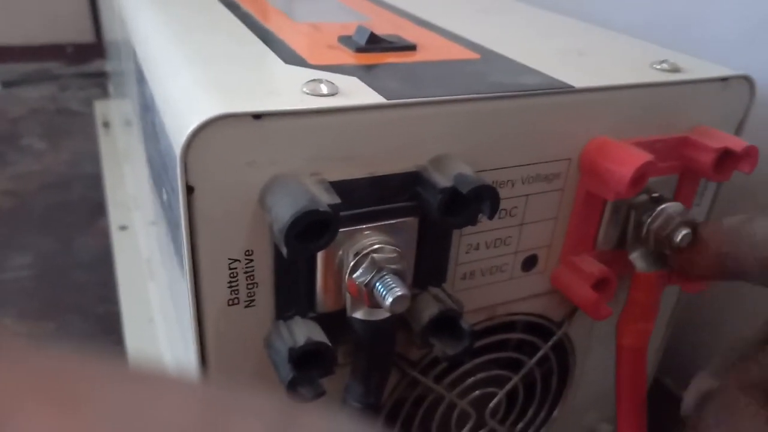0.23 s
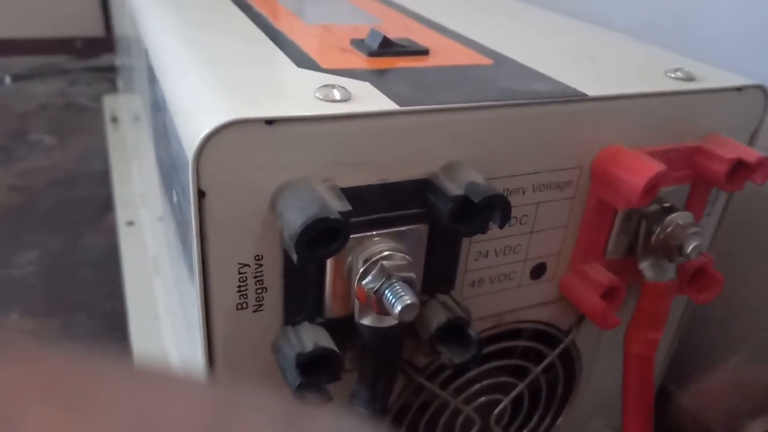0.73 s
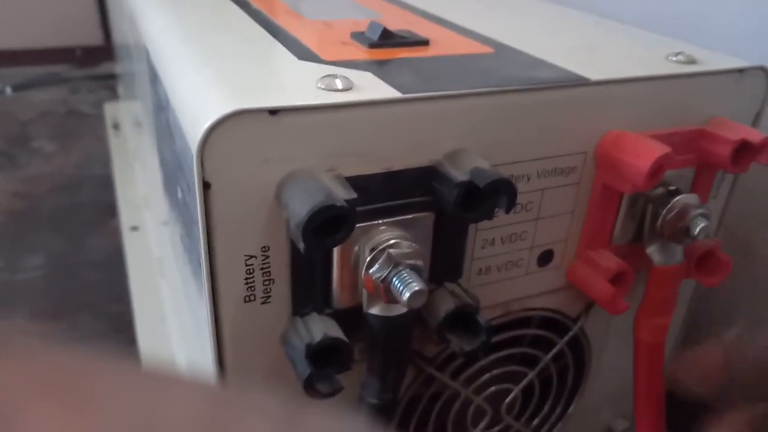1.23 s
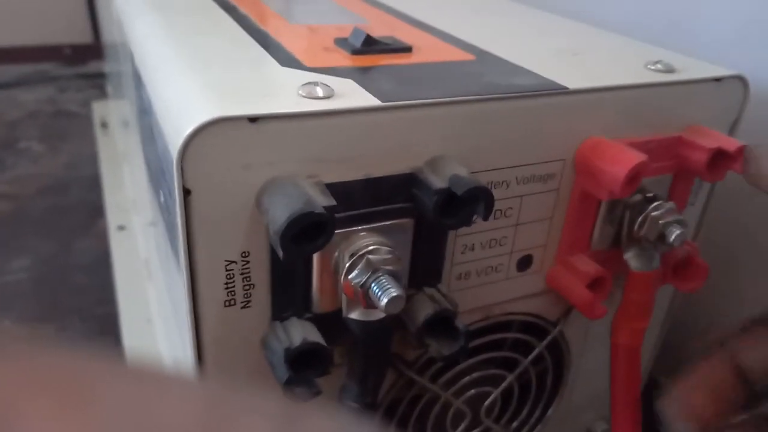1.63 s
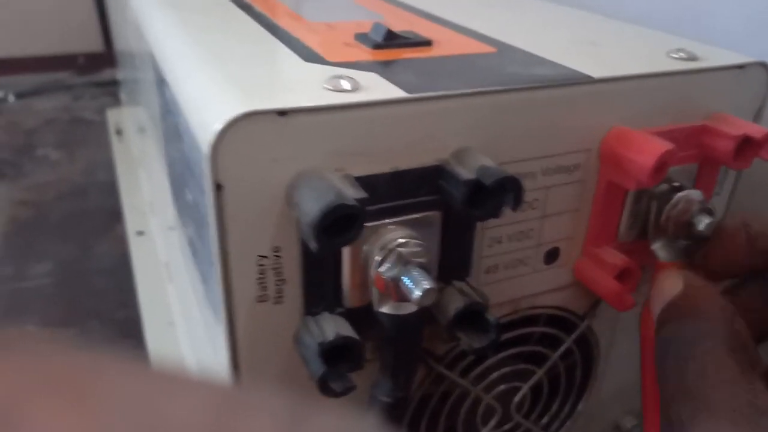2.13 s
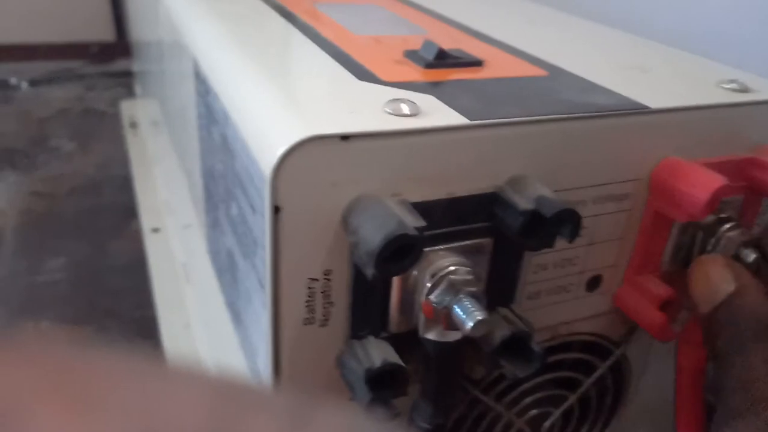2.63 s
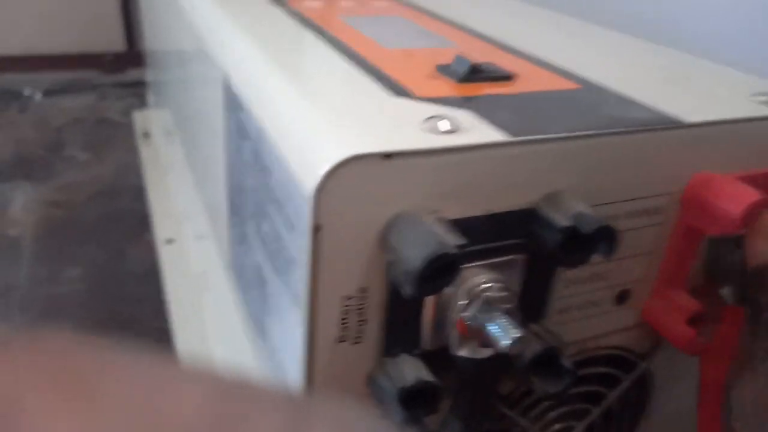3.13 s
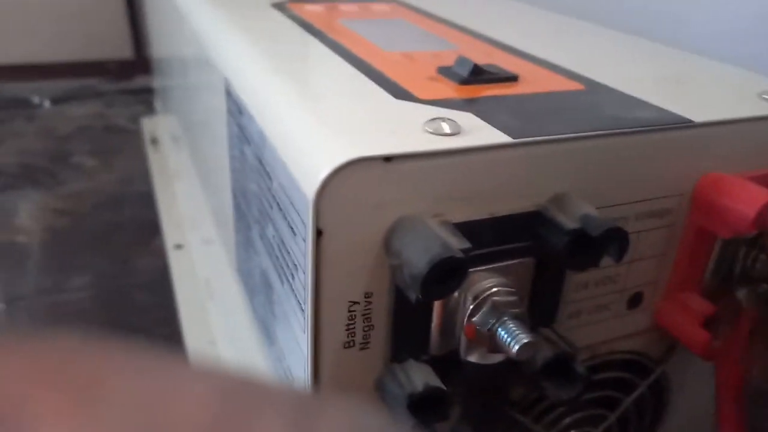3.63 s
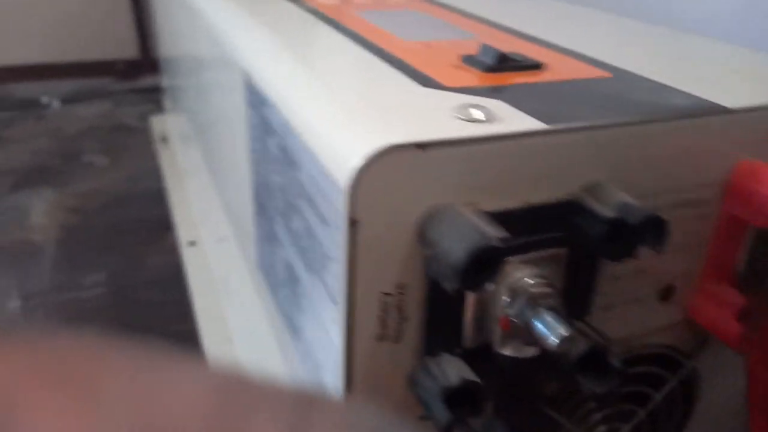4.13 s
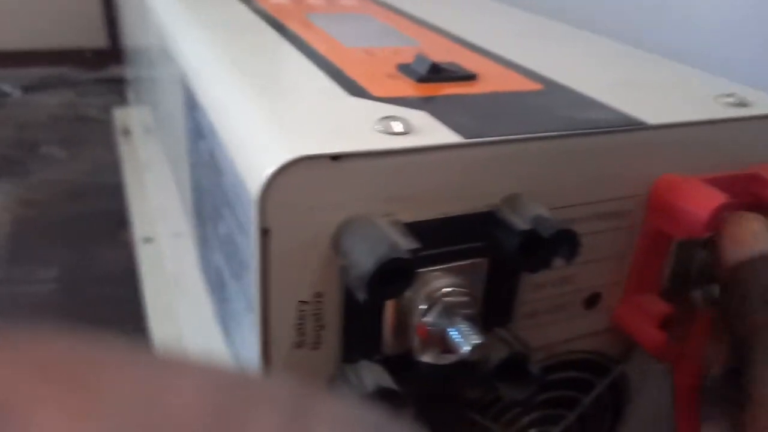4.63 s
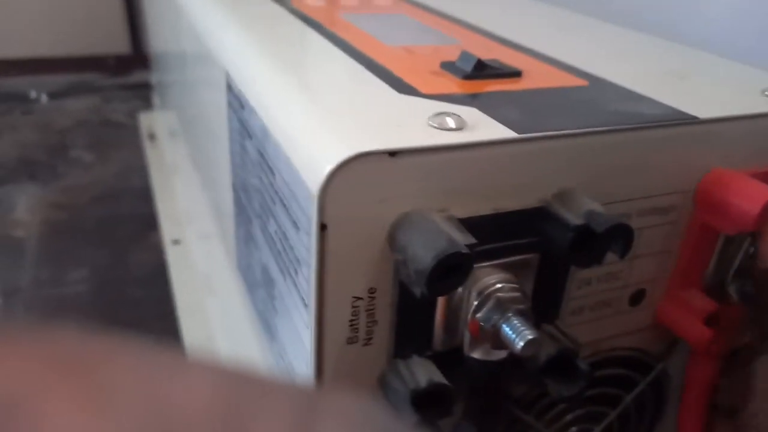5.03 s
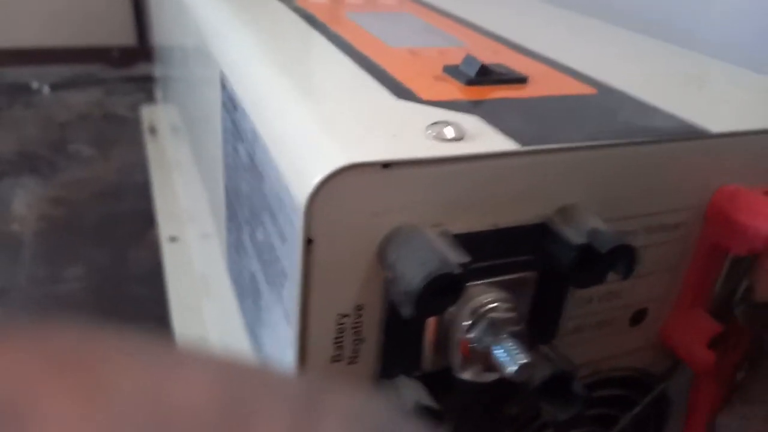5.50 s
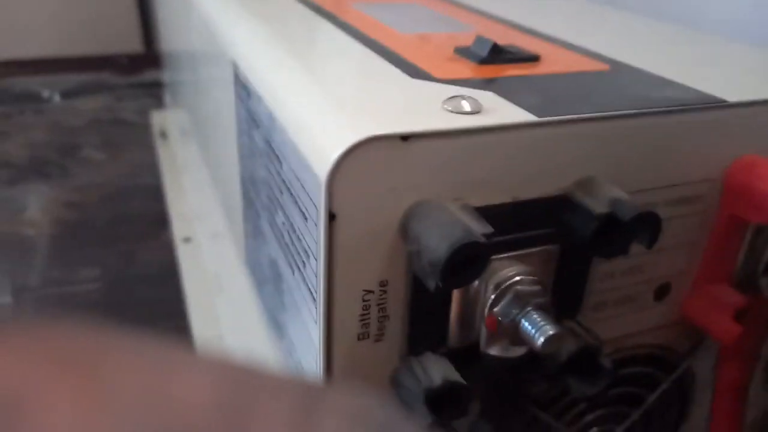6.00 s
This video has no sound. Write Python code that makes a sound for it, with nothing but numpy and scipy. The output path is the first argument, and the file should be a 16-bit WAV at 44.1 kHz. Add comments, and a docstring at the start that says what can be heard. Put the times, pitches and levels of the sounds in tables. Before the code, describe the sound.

A nut is turned by hand on a threaded metal stud fixed to a sheet-steel cabinet, heard very close in a small quiet room. From 0 to 0.65 s come hard, bright clacks with gritty thread scraping and low hollow booms from the case, strongest around 0.2, 0.4 and 0.6. After a short gap, clacks at 0.85 and 1.14 lead to a tight loud burst at 1.35 to 1.4, then more at 1.6 and 1.85. A slightly softer rattle follows near 2.3, faint touches near 2.7, and a clicking cluster at 3.05 to 3.2. From 3.3 on, ticks grow weak, duller and small, with gentle case knocks near 4.1, 5.15 and 5.9. Faint fingertip rustle, a barely audible steady high whine and quiet low-weighted hiss lie underneath to about 6.3 s. Rings are short and dry.

```python
"""Hard clacks of a loose nut on the thread of a terminal stud come first, as fingers spin it down.
The stud stands on a sheet-steel cabinet in a small room: each contact excites many short steel modes,
and tiny slips of the thread grind through the same modes. Hand pressure drives low cabinet resonances
with noise, and fingertips rustle as flickering bands of noise. A thin steady-pitched high tone is a sine
under a level curve; a quiet hiss is noise in narrow bands, with a level curve for those above 1 kHz."""
import sys
import numpy as np
from scipy import signal
from scipy.fft import rfft, irfft, next_fast_len
from scipy.io import wavfile
from scipy.ndimage import uniform_filter1d

SR = 44100
rng = np.random.default_rng(int(sys.argv[2]) if len(sys.argv) > 2 else 0)


def write(x):
    x = np.atleast_2d(x).T
    wavfile.write(sys.argv[1], SR, np.round(np.clip(x, -1, 1) * 32767).astype(np.int16))


N = 276066

# correlation of the two microphone ports: (frequency [Hz], left-right likeness [0 to 1])
LIKENESS = [(40, 0.74), (140, 0.96), (300, 0.89), (650, .65), (1200, 0.14), (15000, 0.012)]


def amp(db):
    """Amplitude ratio from its logarithm, the decibel."""
    return 10 ** (np.asarray(db) / 20)


def rms_one(x):
    """Normalisation of mean power: scale to unit rms."""
    return x / np.sqrt(np.mean(x ** 2) + 1e-20)


def in_time(rows):
    """Linear interpolation in time: each column of a curve table, one value a sample."""
    s, *columns = np.transpose(rows)
    return [np.interp(np.arange(N) / SR, s, column) for column in columns]


def at_hz(points, hz):
    """Interpolation over log frequency, the scale of pitch."""
    table_hz, values = np.array(points).T
    return np.interp(np.log(hz), np.log(table_hz), values)


def noise_pair(hz):
    """Partial coherence: mid and side noise mixed to the port correlation at this frequency."""
    mid, side = rng.uniform(-1, 1, (2, N))
    alike = np.clip(at_hz(LIKENESS, hz), 0, 1)
    return np.sqrt(1 + alike) * mid + np.sqrt(1 - alike) * side * [[1], [-1]]


def steel_modes(count):
    """Modal superposition: dense sheet modes and clear stud modes as decaying sines, one per channel."""
    # clearest modes of stud and bus bar: (frequency [Hz], relative level [dB], t60 [s])
    stud = [(803.4, 9.5, 0.057), (960, -6, 0.2), (1061, -9, 1), (1254, -3.5, 0.71), (2040, -3, .24),
            (2245, -3, .14), (2370, -3, .14), (2495, -2, .14), (2640, -2, .14), (2860, -1, .16),
            (3140, -2, .1), (5200, -4, .1), (5800, 0, .08), (6160, -4, .08), (11400, 0.5, .04),
            (12050, 7, 0.05), (15330, -16.5, .04)]
    # spectrum of the dense sheet modes: (frequency [Hz], relative level per Hz [dB])
    sheet = [(180, -34), (300, -10.5), (488, -8), (694, -12), (1290, -6), (1660, -13.5), (2000, -4.5),
             (3140, -7), (5460, -11.5), (5930, -4), (7630, -23), (9490, -17), (14200, -22), (15700, -41),
             (16500, -48)]
    # sheet decay ahead of the scatter below: (frequency [Hz], t60 [s])
    sheet_t60 = [(300, 0.9), (1500, 0.37), (5000, 0.18), (14000, 0.092)]
    sheet_hz = np.sort(rng.uniform(np.sqrt(300), np.sqrt(16500), count) ** 2)
    stud_hz, stud_db, stud_t60 = np.transpose(stud)
    hz = np.r_[sheet_hz, stud_hz]
    scattered_t60 = at_hz(sheet_t60, sheet_hz) * amp(rng.normal(-4.0, 3.0, count))
    t60 = np.r_[scattered_t60, stud_t60]

    # sparser, shorter modes carry more each
    width_db = 5 * np.log10(sheet_hz / 3000) - 10 * np.log10(scattered_t60)
    level_db = np.r_[at_hz(sheet, sheet_hz) + width_db, stud_db + 4.0]

    # the ports hear each mode at another phase, further apart where they are less alike
    t = np.arange(int(0.26 * SR), dtype=np.float32) / SR
    left = rng.uniform(0, 2 * np.pi, len(hz))
    spread = np.sqrt(-2 * np.log(np.clip(at_hz(LIKENESS, hz), 0.01, 1)))
    right = left + spread * rng.standard_normal(len(hz))
    settings = np.float32([2 * np.pi * hz, np.log(1000) / t60, left, right])
    turn, loss, left, right = settings[:, :, None]
    fade = np.exp(-loss * t)
    rings = np.array([fade * np.sin(turn * t + phase) for phase in (left, right)])
    return hz, level_db, rings, t


def clacks(hz, level_db, rings, t):
    """Impact excitation: a first blow and a swelling, dying chatter convolved with the steel's response."""
    # nut against thread: (time [s], nominal peak level [dB], 300-1500 Hz level [dB],
    # 4.5-7 kHz level [dB], 8-15 kHz level [dB], chatter time constant [ms])
    contacts = np.array([(0.0024, -24, -40, -13, -22, 1.4), (0.023, -28, -22, -2, -5, 1.6),
                         (0.155, -27.5, -14, 7, 2.5, 1.8), (0.1715, -23.5, -44, -22, -43, 1.6),
                         (0.1847, -14.5, -28, -13, -19.5, 1.5), (0.2533, -24, -9, -10.5, -13, 0.62),
                         (0.3733, -26, -33, -12, -18, 2.7), (0.3948, -26, -17, -13, -19, 4.2),
                         (0.4073, -12.5, -25.5, -15, -19, 1.5), (0.4636, -25, -5, -9, -9, 1.6),
                         (0.591, -27.5, -18, 0, -1, 2), (0.617, -9, -20, -13.5, -24, 3),
                         (0.8543, -22, -18, 1, -5.5, 3.3), (1.0718, -25.5, -34, -9, -7.5, 2.3),
                         (1.1365, -27.5, -32, -18, -20.5, 7), (1.1444, -14.5, -24, -9, -14.5, 1.67),
                         (1.228, -32.5, -8.5, 2, -0.5, 4.4), (1.3431, -27, -42, -14, -22, 1.6),
                         (1.3587, -13, -38, -10.5, -11, 1.1), (1.3711, -11.5, -16.5, -14, -19.5, 4.1),
                         (1.412, -22.5, -7, -5, -4.5, 0.82), (1.594, -20.5, -13, 5.5, 5, 2.2),
                         (1.6191, -11.5, -27, -2, -3, 1.2), (1.7603, -26, -47, -13, -20.5, 1.55),
                         (1.809, -33, -33, -21, -37, 1.8), (1.8403, -18, -33, -15.5, -18, 4.1),
                         (1.8486, -17, -22.5, -10.5, -17, 2.4), (2.2347, -31.5, -16.5, -3, -13.5, 0.86),
                         (2.271, -28, -24, -20, -25, 2.7), (2.2865, -21, -34, -14.5, -19, 7.5),
                         (2.3062, -18, -23, -13, -18.5, 9.7), (2.372, -30.5, -30, -15, -24, 1.9),
                         (2.3882, -21, -25.5, -18, -21, 1.4), (2.645, -46, -33, -10, -21, 3),
                         (2.663, -39.5, -22, -15, -26, 2.4), (2.6776, -31, -35, -15, -18, 1.4),
                         (2.6891, -29.5, -23, -14.5, -17.5, 8.9), (2.7228, -23, -22, -13, -15, 1.7),
                         (2.83, -42.5, -20, -20, -23, 2.6), (3.053, -21, -37, -5, -14.5, 7.4),
                         (3.0661, -23, -23.5, -13, -18.5, 9.9), (3.1216, -25, -16, -13, -18.5, 10.3),
                         (3.1447, -24.5, -26, -9, -20, 1.9), (3.1634, -17.5, -19, -12, -23.5, 0.88),
                         (3.2386, -45.5, -25, -3, -18, 6.4), (3.3245, -41, -18, -20, -35, 1.8),
                         (3.3407, -41, -14, -16, -38, 9.3), (3.3862, -37, -16, -20, -21, 2),
                         (3.4068, -29.5, -22, -11, -8.5, 8.6), (3.427, -21.5, -19.5, -13.5, -20, 5.5),
                         (3.5926, -51.5, -22.5, -1, -23, 13), (3.723, -45.5, -38, -17, -33, 2.8),
                         (3.7415, -31.5, -28, -13.5, -28, 11.6), (3.8077, -40, -5, -30, -16, 2.7),
                         (3.928, -55.5, -14, -30, -32, 12), (3.9638, -46.5, -15.5, 0, -10, 5.5),
                         (4.053, -42, -19, -10, -23, 1.5), (4.077, -43, -17, -19, -26, 3.9),
                         (4.091, -34, -24, -24, -21, 3.8), (4.1119, -27.5, -23, -20, -30, 2.6),
                         (4.2688, -45, -17, -4, -5, 4.4), (4.382, -55.5, -8, -11.5, -18, 3.4),
                         (4.396, -48.5, -12, -27, -18, 2.2), (4.4103, -36.5, -16.5, -18.5, -21.5, 8.2),
                         (4.4573, -41.5, -15, -25, -22.5, 2.2), (4.6305, -40.5, -7, -16.5, -21, 2.8),
                         (4.6565, -41.5, -6, -28, -25, 2.8), (4.7537, -57, -13, -6, -11, 7.2),
                         (4.8043, -42, -13, -21, -18, 2.4), (5.1327, -55, -11, -8, -17, 3),
                         (5.1466, -38.5, -19, -11, -20, 1.3), (5.157, -32.5, -26, -25, -20.5, 3.7),
                         (5.208, -40, 1, -11, -11, 6.1), (5.308, -50.5, -7, 13, -9, 12),
                         (5.3435, -35, -47, -9, -13, 0.73), (5.473, -48, -4, -9, -13, 3),
                         (5.4966, -43.5, -17, -31, -28, 2.9), (5.5198, -47, -10, -29, -35, 2.5),
                         (5.5825, -50, -25, -20, -23.5, 7.5), (5.7104, -40.5, -17, -7, -13, 1.15),
                         (5.861, -47, -7, -17, -26, 3.8), (5.874, -38.5, -7.5, -19.5, -24.5, 6.1),
                         (5.893, -48, -19.5, -20.5, -22, 1.7), (5.9594, -46, -10, -7, -14, 6.3),
                         (6.049, -53, -18.5, -7, -9, 15)])
    usual_db = (-17, -13, -17.5)    # what those three bands hold when the steel is struck evenly
    crest_db = 8.5                  # peak of a contact over its loudest rms
    first_blow_db, softer_db_per_ms = -2.5, 0.2     # blow against chatter; softer with a long chatter
    grip_t60_s, freer_s_per_ms = 1, 0.03    # damping by the fingers; freer with a long chatter

    # colour of each contact, and another spot that pushes or pulls each mode
    tilt_hz = (900, 1900, 3600, 5200, 7000, 9000)
    tilts = []
    for low, treble, top in contacts[:, 2:5] - usual_db:
        tilt_db = (low, 0, 0, treble, treble, top)
        tilts.append(at_hz(list(zip(tilt_hz, tilt_db)), hz))
    spot = rng.choice([-1, 1], (len(contacts), len(hz)))
    shared_db = rng.normal(0, 1.2, spot.shape)
    own_db = rng.normal(0, 4.1, (2, *spot.shape))   # for each channel
    struck = np.float32(spot * amp(level_db + tilts + shared_db + own_db)) @ rings
    struck *= 1 - np.exp(-t / 0.00029)      # the blow takes a moment to spread through the steel
    struck *= 1 + amp(5.5) * amp(-60 * t / 0.012)   # small parts crack and go quiet before the sheet

    span = np.arange(2600) / SR
    shape = (len(contacts), len(span))
    jolts = rng.laplace(size=shape) * (rng.random(shape) < 0.1)
    out = np.zeros((2, N + 2 * len(t)))
    for row, ring, jolt in zip(contacts, struck.swapaxes(0, 1), jolts):
        s, peak_db, *_, chatter_ms = row
        age = span / (max(chatter_ms, 0.2) / 1000)
        chatter = jolt * age * np.exp(-age)
        chatter = chatter / np.sqrt(np.sum(chatter ** 2) + 1e-9)
        chatter[0] = amp(first_blow_db - softer_db_per_ms * chatter_ms)
        damped = ring * amp(-60 * t / (grip_t60_s + freer_s_per_ms * chatter_ms))
        sound = signal.fftconvolve(damped, chatter[None], axes=1)
        loudest = np.max(uniform_filter1d(np.mean(sound ** 2, axis=0), size=300))
        at = round(s * SR)
        out[:, at:at + sound.shape[1]] += amp(peak_db - crest_db) * sound / np.sqrt(loudest)
    return out[:, :N]


def grinding(hz, level_db, rings, grind_db):
    """Stick-slip friction: tiny uneven slips of thread on thread, convolved with the same steel."""
    # tilt in dB per band: up for a light touch, down as the nut seats
    brighter_per_db, firm_db, duller_per_s = 0.0535, -45.5, 0.6
    bright_db = brighter_per_db * (firm_db - grind_db) - duller_per_s * np.arange(N) / SR
    bright_db = np.clip(bright_db, -8, 8)

    strength = amp(1.4 * np.minimum(rng.exponential(1, N), 5))
    slips = strength * rng.choice([-1, 1], N) * (rng.random(N) < 6000 / SR)     # about 6000 a second
    damping = amp(-300 * np.arange(rings.shape[2]) / SR)    # 300 dB per second
    out, power = 0, 0
    edges = [0, 1500, 3000, 6000, 10000, SR]    # Hz
    for band, (low, high) in enumerate(zip(edges, edges[1:])):
        body = np.float32(amp(level_db) * (hz >= low) * (hz < high)) @ rings * damping
        push = amp(grind_db + bright_db * (band - 1.5)) * rms_one(slips)
        out = out + signal.oaconvolve(body, push[None], axes=1)[:, :N]
        power += np.sum(body ** 2) / 2
    return out / np.sqrt(power)


def pushes():
    """Power addition of envelopes: each push swells, holds and fades linearly in decibels."""
    # pushes of the hand: (time [s], grinding level [dB], knocking of the case level [dB],
    # panel boom level [dB], rocking level [dB])
    twists = [(0.0, -32, -37.5, -36.5, -45), (0.19, -36, -42, -36, -46), (0.248, -49, -48.5, -45, -63),
              (0.422, -39, -38, -32.5, -43.5), (0.5, -51.5, -49.5, -47.5, -46.5),
              (0.632, -34, -33.5, -38, -44.5), (0.719, -56, -65, -52.5, -49.5),
              (0.872, -54, -48.5, -46.5, -53.5), (1.168, -39.5, -52.5, -50, -57.5),
              (1.392, -34.5, -36.5, -37, -47), (1.47, -55, -60, -66, -58), (1.64, -38, -43.5, -45.5, -54),
              (1.871, -38, -51, -50, -61), (2.321, -70, -41, -45.5, -57), (2.408, -46.5, -48, -51.5, -56),
              (2.548, -61.5, -65.5, -69, -73), (2.741, -40, -44, -54, -63), (2.82, -57.5, -59.5, -57, -64),
              (3.1, -65, -51, -51, -69), (3.188, -46.5, -45, -46, -51), (3.35, -58, -60, -66, -55),
              (3.468, -48, -52, -51, -67), (3.782, -45.5, -56.5, -46.5, -59),
              (3.63, -78.5, -84, -71, -63.5), (3.958, -58.5, -58.5, -59, -69),
              (4.122, -44, -52.5, -49, -54), (4.29, -65, -66, -59.5, -67),
              (4.442, -53.5, -53.5, -56.5, -67), (4.652, -58.5, -57, -54, -53),
              (4.749, -64, -58, -45.5, -62), (4.801, -57.5, -53.5, -49, -60.5),
              (5.182, -48.5, -53, -46, -53), (5.26, -82, -58, -50.5, -57),
              (5.369, -62.5, -60.5, -48.5, -57.5), (5.508, -52, -51.5, -52, -62),
              (5.6, -70, -58.5, -56.5, -66), (5.738, -61, -61, -60, -66.5),
              (5.908, -53.5, -47.5, -49.5, -67), (6.12, -82, -67.5, -62.5, -64)]
    # answers to a push, each as (grinding, knocking, boom, rocking): delay of the peak [ms]
    lags_ms = (1, 3, 12, 40)
    # rise to the peak [dB per ms]
    swells = (0.45, 0.4, 0.38, 0.22)
    # time held at the peak [ms]
    holds_ms = (4, 10, 45.6, 29)
    # fall after the hold [dB per ms]
    fades = (0.23, 0.18, 0.18, 0.3)
    s, *peaks_db = np.transpose(twists)
    coarse_s = np.arange(0, N + 64, 64) / SR
    levels = []
    for peak_db, lag, swell, hold, fade in zip(peaks_db, lags_ms, swells, holds_ms, fades):
        since_ms = (coarse_s[:, None] - s) * 1000 - lag
        rise_db = np.minimum(swell * since_ms, 0)
        fall_db = fade * np.maximum(since_ms - hold, 0)
        power = amp(2 * (peak_db + rise_db - fall_db)).sum(axis=1)
        levels.append(np.interp(np.arange(N) / SR, coarse_s, 10 * np.log10(power + 1e-12)))
    return levels


def hollow(modes, level_db):
    """Forced resonance: hand pressure, as noise, drives a few low two-pole resonators."""
    out = 0
    for hz, width, mode_db in modes:
        r = np.exp(-np.pi * width / SR)
        b, a = [1, 0.0082, -1], [1, -2 * r * np.cos(2 * np.pi * hz / SR), r * r]
        once = signal.lfilter(b, a, noise_pair(hz))
        twice = signal.lfilter(b, a, once)
        out = out + amp(mode_db) * rms_one(twice)
    return amp(level_db) * rms_one(out)


def rustle():
    """Friction noise: fingertips resting and sliding on the nut give bright bands that flicker."""
    # skin on metal: (time [s], level [dB])
    rustle_curve = [(0, -90), (0.6, -76), (0.95, -83.5), (1.3, -77.5), (1.75, -72.5), (2.1, -86),
                    (2.5, -79), (2.95, -88.5), (3.3, -78), (3.7, -83), (4.0, -75), (4.35, -78), (4.6, -82),
                    (4.75, -70), (4.92, -83), (5.08, -76), (5.25, -78.5), (5.55, -76), (5.82, -87),
                    (6.03, -73.5), (6.2, -89)]
    # its bands: (low edge [Hz], high edge [Hz], relative level [dB])
    bands = [(5100, 6900, 3), (8590, 15000, -4), (10800, 12000, 0)]
    out = 0
    for low_hz, high_hz, db in bands:
        flicker_db = 2.5 * np.interp(np.arange(N) / SR * 25, np.arange(400), rng.standard_normal(400))
        band_pass = signal.butter(3, [low_hz, high_hz], "band", fs=SR, output="sos")
        band = signal.sosfilt(band_pass, noise_pair(low_hz))
        out = out + amp(db + flicker_db) * rms_one(band)
    return amp(in_time(rustle_curve)[0]) * out


def whine():
    """Amplitude modulation: a thin steady-pitched high tone, a level curve plus small random changes."""
    # level of the tone before the random changes: (time [s], rms level [dB])
    whine_curve = [(0.0, -92), (0.64, -84.5), (1.1, -90.5), (1.25, -78), (2.14, -79.5), (2.67, -84),
                   (2.89, -95), (3.1, -97.5), (3.24, -88), (3.75, -83), (4.43, -76), (5.33, -83),
                   (5.87, -79), (6.26, -84)]
    whine_hz, change_db, changes_per_s = 11291, 2, 9.9
    t = np.arange(N) / SR
    random_db = change_db * np.interp(t * changes_per_s, np.arange(200), rng.standard_normal(200))
    level = np.sqrt(2) * amp(in_time(whine_curve)[0] + random_db)
    tone = level * np.sin(2 * np.pi * whine_hz * t)
    return tone * amp([[1.5], [-1.5]])      # 3 dB stronger on the left before the ports' own colour


def hiss():
    """Spectral shaping of broadband noise: a quiet hiss built from narrow bands."""
    # spectrum: (frequency [Hz], relative level per Hz [dB])
    spectrum = [(18, -42), (30, -9.5), (70, 9), (149, 0.5), (259, -7.5), (1100, -22), (2410, -25),
                (4530, -40), (6210, -26), (6900, -28.5), (7670, -75.5), (11700, -38.5), (16000, -45)]
    # level curve of the bands above 1 kHz: (time [s], level change [dB])
    treble_curve = [(0, -0.5), (1.9, -1.5), (2.15, 5), (2.6, 2.5), (3.0, -1.5), (3.6, -4.5), (4.7, 7.5),
                    (5.0, 1.3), (5.6, 2), (6.0, 4.5), (6.26, -4.5)]
    hiss_db = -65.5     # overall rms
    out, edges = 0, 30 * 2 ** np.arange(0, 9.3, 0.6)
    treble_db = in_time(treble_curve)[0]
    for low, high in zip(edges, edges[1:]):
        hz = np.sqrt(low * high)
        band_pass = signal.butter(2, [low, high], "band", fs=SR, output="sos")
        band = signal.sosfilt(band_pass, noise_pair(hz))
        out = out + amp(at_hz(spectrum, hz) + treble_db * (hz > 1000)) * band
    return amp(hiss_db) * rms_one(out)


def scene():
    """Linear superposition of nut, cabinet, fingertips, high tone and hiss."""
    # the whole cabinet rocking: (frequency [Hz], resonator width [Hz], relative level [dB])
    frame = [(50, 17, -10), (82.7, 15, 8)]
    # big panels booming: (frequency [Hz], resonator width [Hz], relative level [dB])
    panels = [(118, 22, -10), (152, 28, 1.5), (213.4, 24, -7.5)]
    # case knocking: (frequency [Hz], resonator width [Hz], relative level [dB])
    case = [(298, 120, 7.5), (398, 50, 2.5), (478.6, 44, 2.5), (601, 170, 5.5), (929, 87, -3),
            (955, 19, -6), (1018, 13, -6)]
    grind_db, knock_db, boom_db, rock_db = pushes()
    hz, level_db, rings, t = steel_modes(count=1050)
    nut = clacks(hz, level_db, rings, t) + grinding(hz, level_db, rings, grind_db)
    cabinet = hollow(frame, rock_db) + hollow(panels, boom_db) + hollow(case, knock_db)
    return nut + cabinet + rustle() + whine() + hiss()


def record(dry):
    """Linear filtering: the two microphone ports differ in colour, share a dip, and the top is cut."""
    # left channel over right: (frequency [Hz], level difference [dB])
    left_over_right = [(60, -5), (150, -2.5), (380, -5), (950, -2), (2380, 7.5), (5980, 2), (15000, 3.5)]
    notch_hz, notch_width_hz, notch_db = 7740, 440, -7.5    # dip of the ports
    size = next_fast_len(N + 4096)
    hz = np.maximum(np.fft.rfftfreq(size, 1 / SR), 20)
    dip_db = notch_db * np.exp(-((hz - notch_hz) / notch_width_hz) ** 2)
    sides_db = at_hz(left_over_right, hz) / 2 * np.array([[1], [-1]])
    ports = irfft(rfft(dry, size) * amp(dip_db + sides_db), size)[:, :N]
    low_pass = signal.cheby2(12, 70, 16950, fs=SR, output="sos")    # 70 dB down from 16950 Hz
    return signal.sosfilt(low_pass, ports)


dry = scene()
out = record(dry)
write(out)
```